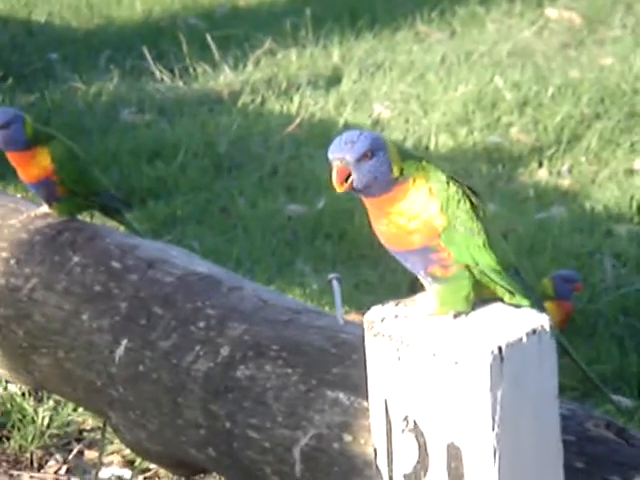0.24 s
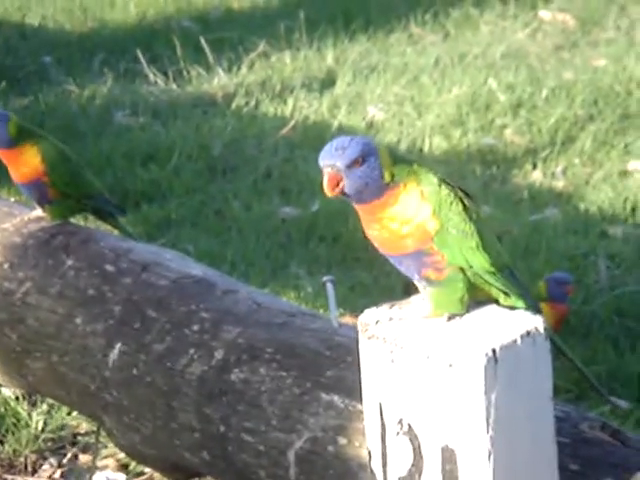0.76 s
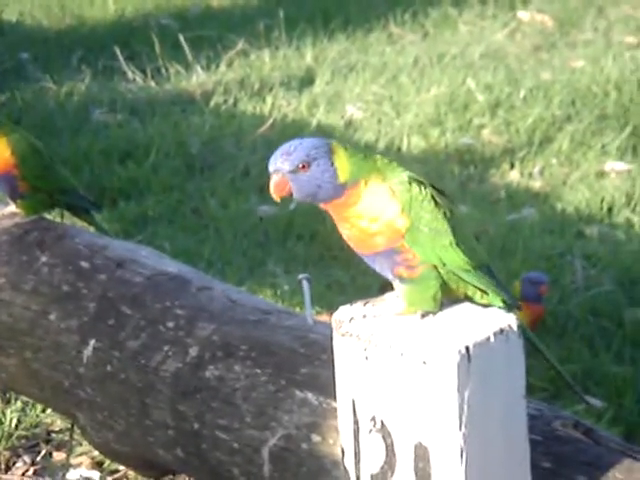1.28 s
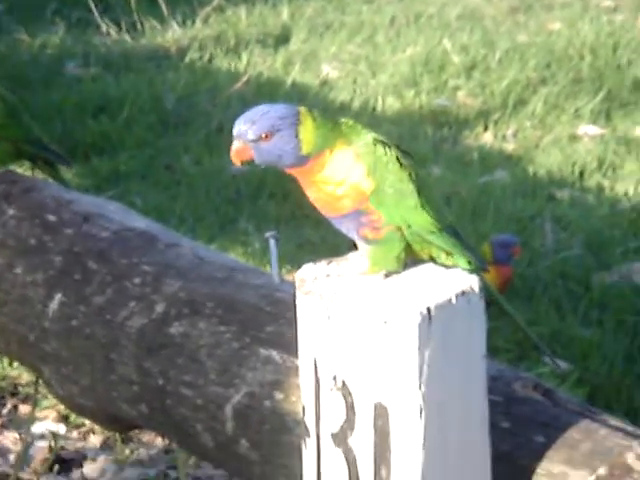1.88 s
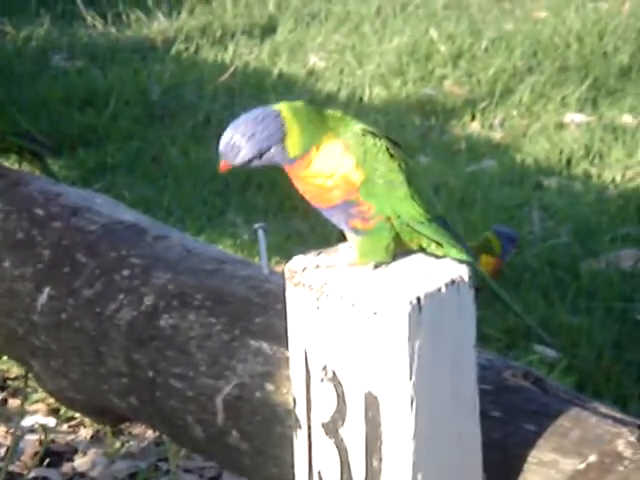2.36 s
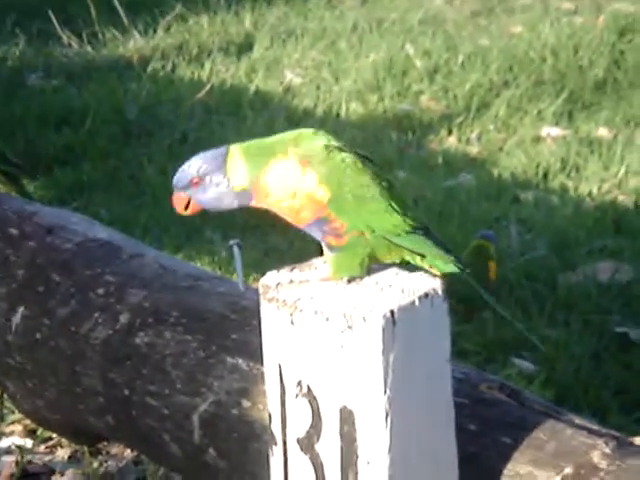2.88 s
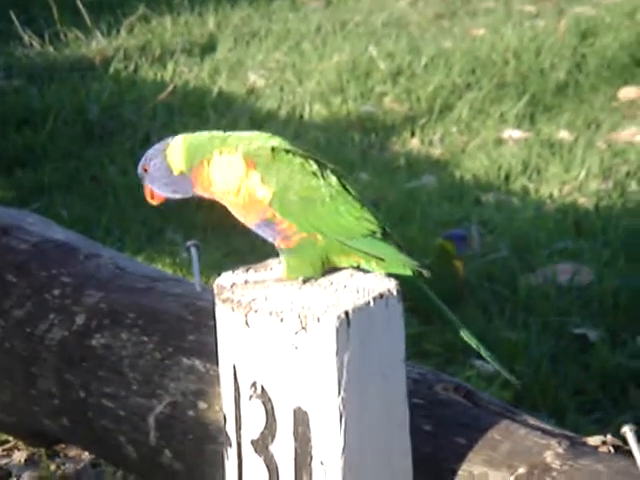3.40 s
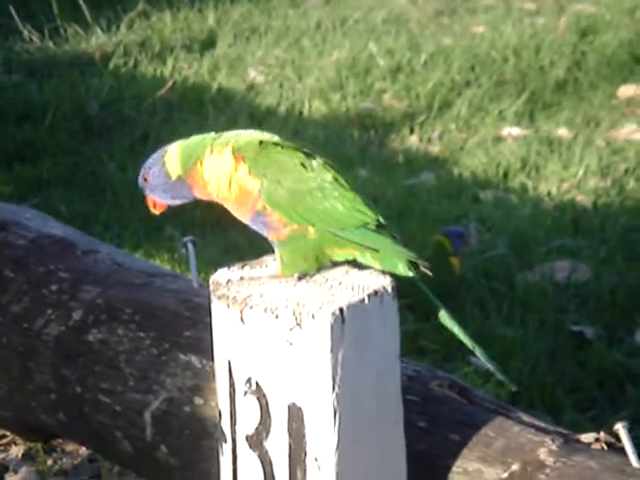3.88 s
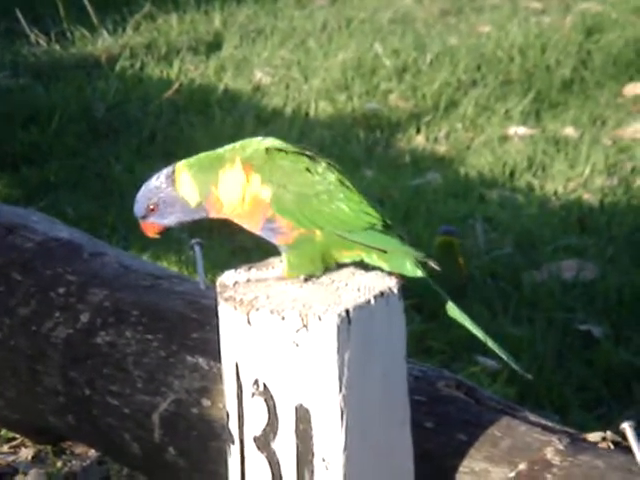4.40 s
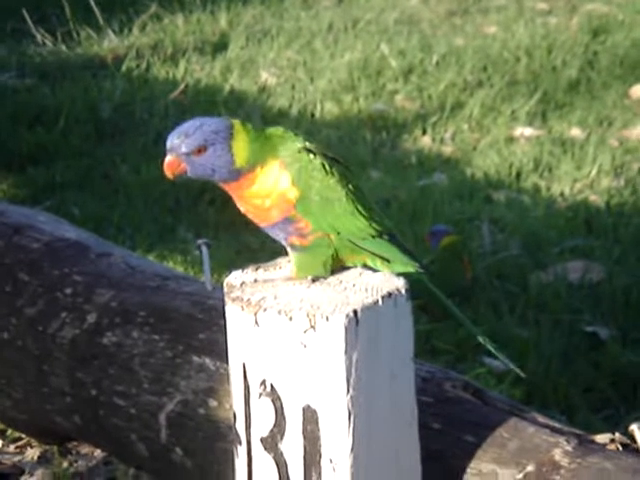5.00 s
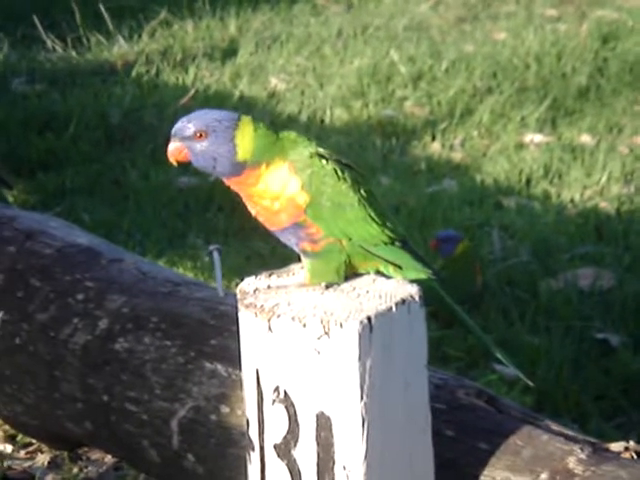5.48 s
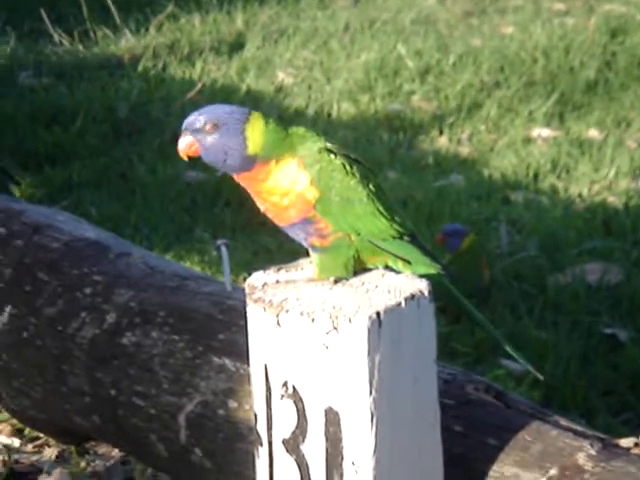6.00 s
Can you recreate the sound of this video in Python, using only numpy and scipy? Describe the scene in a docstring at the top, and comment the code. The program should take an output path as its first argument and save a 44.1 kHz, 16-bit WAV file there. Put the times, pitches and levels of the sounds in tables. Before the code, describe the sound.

Short, raspy parrot screeches come in bursts close by, while other birds chirp and chatter softly in the breezy background.

```python
"""A lorikeet screeches in quick runs on a lawn: its syrinx starts slack and raspy, then tightens and
scoops up to a shrill, buzzing whistle. Neighbours chirp, a beak or claw taps on wood, a flock chatters
in the trees, one far bird pips and a larger one honks. The trees echo faintly over a rush of breeze
and far traffic. An automatic gain control ducks that rush at each screech and lets it creep back."""
import sys
import numpy as np
from scipy import signal
from scipy.fft import rfft, irfft, next_fast_len
from scipy.io import wavfile
from scipy.ndimage import uniform_filter1d, map_coordinates

SR = 44100
rng = np.random.default_rng(int(sys.argv[2]) if len(sys.argv) > 2 else 0)


def waveform_to_disk(signal):
    """Save audio, clipped to [-1, 1], as 16-bit WAV at the path in sys.argv[1]."""
    frames = np.transpose(np.atleast_2d(signal))
    scaled = np.clip(frames, -1, 1) * 32767
    samples = np.round(scaled).astype(np.int16)
    wavfile.write(sys.argv[1], SR, samples)


N = 275625

# the lead bird's screeches:
# start_s, length_s, held_hz, rise_hz, sag_hz, level_db, second_partial_db, buzz_depth_hz
SCREECH_CALLS = [ (.073, 0.08105, 2708, 45.5, 24.5, -6.5, -1, 55.7),
                 (.251, 0.0967, 2643, 176.4, 169.5, -6.5, 1, 107.8),
                 (0.46, 0.1, 2657, 223.6, 43.5, -5, -1, 30.1),
                 (.717, 0.0997, 2685, 50.2, 34.5, -8, -4, 50.1),
                 (0.94, 0.1056, 2700, 110.7, 74.5, -7.5, -3.5, 69.8),
                 (1.19, 0.0847, 2439, 431.9, 1, -12, -5, 93),
                 (2.959, 0.1072, 2819, 29.55, 56.5, -10, 3.5, 21.48),
                 (3.152, 0.09646, 2725, 188.9, 104, -8.5, 5, 80.6),
                 (3.339, 0.0981, 2785, 35.13, 39, -8.5, 8.5, 60.4),
                 (3.558, 0.0956, 2692, 78.6, 66, -8, -1.5, 51.4),
                 (3.868, 0.09685, 2640, 111.2, 63, -12, 1, 34.08),
                 (4.104, 0.1116, 2666, 93.45, 64, -11.5, 0, 28.05),
                 (4.815, 0.1104, 2688, 129.4, 92.5, -9.5, -.5, 33.43)]
# tone colour of its windpipe and open beak: frequency_hz, gain_db
BEAK_EQ = [(900, -2), (1900, -5.5), (2750, -1), (3500, -3.5), (4200, -2.5), (5100, 0.5), (5700, -2),
           (6600, -4), (7600, 1.5), (8300, -1), (9000, -1.5), (9800, 3)]
# low croaks that open some screeches: start_s, level_db
CROAK_CUES = [(.237, -25), (2.953, -30), (3.328, -28.5)]
# the fading echo of an earlier screech, then the neighbours' soft chirps:
# start_s, length_s, start_hz, end_hz, level_db
TAIL_AND_CHIRP_NOTES = [ (0, 0.0674, 2840, 2790, -37.5), (1.495, 0.0627, 2070, 2176, -41.5),
                        (1.56, 0.037, 2129, 2377, -33), (1.615, 0.036, 3583, 2550, -26.5),
                        (1.643, 0.02744, 2300, 2787, -24), (5.05, 0.0432, 2714, 2500, -34.5),
                        (5.088, 0.0255, 3563, 3142, -39), (5.118, 0.0316, 4066, 4000, -37.5)]
# dry taps on wood: start_s, level_db
TAP_CUES = [(.891, -22.5), (2.235, -35)]
# ringing modes of that wood: pitch_hz, level_db, t60_s
WOOD_MODES = [(613.6, -6.5, 0.062), (1241, 9.5, 0.0131), (2815, 9.5, 0.0061)]
# the larger bird's far honks: start_s, length_s, start_hz, end_hz, level_db
HONK_NOTES = [(5.708, 0.0429, 523.8, 508, -31.5), (5.815, .185, 555, 462, -32.5)]
# resonances of its throat: frequency_hz, gain_db
THROAT_EQ = [(500, -32), (1050, -8.5), (1530, 3), (2050, -21), (2550, -1.5), (3100, -11.5), (4500, -31.5)]
# calls of two nearer members of the flock: start_s, length_s, start_hz, end_hz, level_db
CHATTER_NOTES = [(2.04, 0.1, 2430, 2384, -56.5), (2.18, 0.076, 2257, 2400, -45.5),
                 (5.49, 0.2, 2080, 2299, -43), (5.675, 0.1207, 2002, 2097, -38.5)]
# a far bird's plain whistles: start_s, level_db
PIP_CUES = [(0.152, -46.5), (0.929, -46), (1.411, -45), (1.7, -48.5), (2.27, -47)]
# swells of the flock's chatter: middle_s, half_length_s, level_db
FLOCK_BOUTS = [(1.485, 0.22, -40.5), (2.1, 0.23, -43.5), (2.548, 0.063, -45), (3.27, 0.185, -36.5),
               (5.074, 0.1386, -36.5), (5.779, 0.171, -38)]
# tone colour of the far flock: frequency_hz, gain_db
FLOCK_EQ = [(1200, -42.5), (2000, -26.5), (2900, -2), (3500, 0), (4300, 2.5), (5000, -8), (5900, -7.5),
            (7000, -20.5), (10000, -19.5)]
# decay of the echo among the trees: frequency_hz, t60_s
TREE_DECAY = [(500, 0.19), (3000, 0.756), (5500, 1.018), (10000, 1.22)]
# tone colour of the outdoor rush: frequency_hz, gain_db
AIR_EQ = [(25, -31), (55, -20), (100, -8.5), (165, -4), (350, -3), (950, -1), (1600, -7.5), (2800, -9.5),
          (4300, -16.5), (6500, -23), (10000, -23)]
# slow level ride of that rush: time_s, level_db
AIR_RIDE = [(0, -42.5), (1.5, -41), (2.8, -42), (4.6, -43), (5.5, -40), (6.25, -40)]

SLACK_HZ, SCOOP_S = 1834.3, .025  # a screech's opening pitch and its time to tighten
ATTACK_S, HEAD_START_S, RELEASE_S = 0.02402, 0.00494, .013
SAG_SKEW = 1.518  # over 1 puts the pitch sag past the middle of the call
BUZZ_RATE_HZ, BUZZ_SLOWING, BUZZ_FADE = 465, 0.705, 0.51  # slowing: Hz of rate lost per Hz of depth
THIRD_DB, THIRD_FOLLOWS = -25.5, .15  # third partial: alike in loud and soft calls, follows the second
SWELL_DB, SWELL_DB_PER_HZ, SPENT_PER_DB, ARCH_DB = 2.99, 0.0029, 1.1947, 2.5
SCRATCH_DB, SCRATCH_SPREAD_HZ = -13, 280


def screeches(jitter_hz=14, rasp_hz=90, flutter_db=1.8, drift_db=2.9):
    """The syrinx starts slack and raspy, tightens to a whistle, and a second vibration buzzes it."""
    out = np.zeros(N)
    for start_s, length_s, held_hz, rise_hz, sag_hz, level_db, second_db, depth_hz in SCREECH_CALLS:
        t = np.arange(int((length_s + RELEASE_S / 2) * SR)) / SR
        from_middle = t / length_s - 1 / 2
        tight = fade(t / SCOOP_S)
        slack = 1 - tight
        # after the scoop the pitch climbs, with one sag on the way
        hold = np.clip((t - SCOOP_S) / (length_s - SCOOP_S), 0, 1)
        whistle_hz = held_hz + rise_hz * hold - sag_hz * np.sin(np.pi * hold ** SAG_SKEW) ** 2
        # a deeper buzz is slower, and it settles as the call goes on
        rate_hz = (BUZZ_RATE_HZ - BUZZ_SLOWING * depth_hz) * (1 + 0.11 * wobble(t, 200))
        buzz = np.sin(2 * np.pi * np.cumsum(rate_hz) / SR)
        buzz *= (1 + .45 * wobble(t, 60)) * (1 - BUZZ_FADE * from_middle)
        grit = np.sqrt(depth_hz / 100)
        rough_hz = (jitter_hz + rasp_hz * slack) * wobble(t, 998.7)
        pitch = SLACK_HZ * slack + whistle_hz * tight + depth_hz * buzz + rough_hz
        # the fundamental stays nearly steady while the overtones flutter
        shimmer = lambda: flutter_db * wobble(t, 793) + drift_db * wobble(t, 80.72)
        third_db = THIRD_DB - level_db + THIRD_FOLLOWS * second_db
        partials = [(1, shimmer() / 5),
                    (2, second_db * tight + 1.5 * slack + shimmer() + 1.5 * buzz * grit),
                    (3, third_db * tight - 6 * slack + shimmer()),
                    (4, -25 + 15 * slack), (5, -30 + 16 * slack)]
        # slack membranes beat unevenly, which puts tones halfway between the partials
        partials += [(k + 1 / 2, -54 + 34 * np.sqrt(slack) + shimmer()) for k in range(4)]
        # the pressure arches and grows with the pitch; a bright, forced call spends its air early
        swell_db = SWELL_DB + SWELL_DB_PER_HZ * rise_hz - SPENT_PER_DB * second_db
        arch_db = ARCH_DB * (1 / 3 - (2 * from_middle) ** 2)
        pressure_db = level_db + swell_db * from_middle + arch_db + .5 * wobble(t, 112.3)
        # part of the second partial breaks into a chaotic scratch
        scratch_hz = 2 * pitch + SCRATCH_SPREAD_HZ * wobble(t, 650)
        scratch = amp(SCRATCH_DB + second_db / 2) * grit * voice(scratch_hz, [(0.994, 0)])
        gate = fade((t + HEAD_START_S) / ATTACK_S) * fade((t[-1] - t) / RELEASE_S)
        add(out, start_s, amp(pressure_db) * gate * (voice(pitch, partials) + scratch))
    return equalise(out, BEAK_EQ)


def croaks(start_hz=890, end_hz=1150, length_s=0.0227):
    """Before it tightens, the syrinx can sound an octave below the scoop."""
    rows = [(start_s, length_s, start_hz, end_hz, level_db) for start_s, level_db in CROAK_CUES]
    partials = [(1, -0.5), (2, 1.0), (3, -3), (4, -22.5)]
    return notes(rows, lambda pitch: partials, rough=.032, edge_s=0.0071, bend=1.9)


def tail_and_chirps():
    """Soft, gliding tones: the fading echo of an earlier screech, then the neighbours' chirps."""
    partials = [(1, 2.5), (2, -3.5), (3, -14.0), (4, -14.0)]
    return notes(TAIL_AND_CHIRP_NOTES, lambda pitch: partials, rough=0.0263, edge_s=0.0093, bend=2.1)


def taps():
    """A beak or claw knocks on wood; each mode builds over a cycle or so and rings very briefly."""
    out, t = np.zeros(N), np.arange(SR // 10) / SR
    for start_s, level_db in TAP_CUES:
        for hz, mode_db, t60_s in WOOD_MODES:
            envelope = amp(level_db + mode_db - 60 * t / t60_s) * fade(t * hz * 2 / 3)
            add(out, start_s, envelope * np.sin(2 * np.pi * hz * t))
    return out


def honks():
    """A hoarse, nasal double call; its partials slide through the throat's steady resonances."""
    partials = lambda pitch: [(k, along(THROAT_EQ, k * pitch)) for k in range(1, 9)]
    return notes(HONK_NOTES, partials, rough=.052, edge_s=0.0158, bend=2.2)


def chatter():
    """Raspy calls from the trees, with the second partial strongest."""
    partials = [(1, -16.5), (2, 3), (3, -9.5), (4, -13.5)]
    return notes(CHATTER_NOTES, lambda pitch: partials, rough=0.0347, edge_s=0.011)


def pips(pitch_hz=1750, length_s=0.0637):
    """A far bird repeats one short, pure note at uneven gaps."""
    rows = [(start_s, length_s, pitch_hz, pitch_hz, level_db) for start_s, level_db in PIP_CUES]
    return notes(rows, lambda pitch: [(1, 0)], rough=0.013, edge_s=.004)


def flock(count=520, centre_hz=2300, glide=.06, calm_db=-47):
    """A bed of overlapping, raspy far calls, blurred by the trees and swelling in bouts."""
    calls = np.zeros(N)
    starts_s = (np.arange(count) + rng.random(count)) * N / SR / count
    for start_s, (high, long, loud) in zip(starts_s, rng.standard_normal((count, 3))):
        t = np.arange(int(0.051 * np.exp(0.37 * long) * SR)) / SR
        rasp = .028 * wobble(t, 900)
        pitch = centre_hz * np.exp(0.22 * high + glide * wobble(t, 30.21) + rasp)
        envelope = amp(0.73 * loud) * np.sqrt(np.hanning(len(t)))
        add(calls, start_s, envelope * voice(pitch, [(1, 4.5), (2, -5), (3, 4.5)]))
    bed = unit(equalise(calls + echo(calls), FLOCK_EQ))
    t = np.arange(N) / SR
    bout_power = sum(amp(level_db) ** 2 * np.exp(-((t - middle_s) / half_s) ** 2)
                     for middle_s, half_s, level_db in FLOCK_BOUTS)
    return bed * np.sqrt(amp(calm_db) ** 2 + bout_power)


def echo(x, predelay_s=0.018):
    """Trunks and leaves scatter the sound back in a diffuse tail."""
    hz, t, noise = signal.stft(rng.standard_normal(SR), SR, nperseg=256)
    decay = amp(-60 * t / along(TREE_DECAY, hz)[:, None])
    tail = signal.istft(noise * decay, SR, nperseg=256)[1]
    delayed = np.pad(x, (int(predelay_s * SR), 0))
    return signal.fftconvolve(delayed, tail / np.linalg.norm(tail))[:N]


def air():
    """The steady rush of breeze and far traffic."""
    t = np.arange(N) / SR
    rush = unit(equalise(rng.standard_normal(N), AIR_EQ))
    ride_db = np.interp(t, *np.transpose(AIR_RIDE))
    return rush * amp(ride_db + 0.15 * wobble(t, 2.8))


def notes(rows, partials, rough, edge_s, bend=1):
    """Unsteady notes voiced by partials(pitch); a bend over 1 makes each glide speed up."""
    out = np.zeros(N)
    for start_s, length_s, start_hz, end_hz, level_db in rows:
        t = np.arange(int(length_s * SR)) / SR
        glide_hz = start_hz + (end_hz - start_hz) * (t / length_s) ** bend
        pitch = glide_hz * (1 + rough * wobble(t, 700))
        gate = fade(np.minimum(t, length_s - t) / edge_s)
        add(out, start_s, amp(level_db) * gate * voice(pitch, partials(pitch)))
    return out


def voice(pitch, partials):
    """A tone of rms 1 on a pitch curve; each partial is a pitch multiple and a level_db."""
    phase = 2 * np.pi * np.cumsum(pitch) / SR
    return unit(sum(amp(db) * np.sin(k * phase) * (k * pitch < SR / 2) for k, db in partials))


def amp(db):
    """Decibels to gain."""
    return 10 ** (np.asarray(db) / 20)


def unit(x):
    """Scale to rms 1."""
    return x / np.sqrt(np.mean(x ** 2) + 1e-20)


def along(points, hz):
    """Read a curve on a log frequency axis."""
    knots_hz, values = np.transpose(points)
    return np.interp(np.log(hz + 1), np.log(knots_hz + 1), values)


def wobble(t, rate):
    """A smooth random curve with rate knots a second."""
    return map_coordinates(rng.standard_normal(int(t[-1] * rate) + 4), [t * rate + 1])


def filtered(x, response):
    """Filter x with the gain response(hz)."""
    size = next_fast_len(N + SR // 2)
    return irfft(rfft(x, size) * response(np.fft.rfftfreq(size, 1 / SR)), size)[:N]


def equalise(x, eq):
    """Colour x with an EQ table."""
    return filtered(x, lambda hz: amp(along(eq, hz)))


def add(track, start_s, sound):
    """Mix a sound in at start_s."""
    room = track[max(round(start_s * SR), 0):][:len(sound)]
    room += sound[:len(room)]


def fade(u):
    """A smooth step from 0 to 1 as u goes from 0 to 1."""
    return np.sin(np.pi / 2 * np.clip(u, 0, 1)) ** 2


def scene():
    """Near birds almost dry, far birds wetter, over the flock and the open air."""
    near = screeches() + croaks() + tail_and_chirps() + taps()
    far = honks() + pips() + chatter()
    echo_send = amp(-23.5) * near + amp(-4.5) * far
    return (near + far + echo(echo_send) + flock() + air())[None]


def record(dry, threshold_db=-15, quick_db_per_s=130, slow_db_per_s=4, slow_share=0.665,
           opening_cut_db=7, detector_s=.005, top_hz=10150):
    """Gain control ducks loud sound, recovers partly at once, fully over seconds; then a high cut."""
    t = np.arange(N) / SR
    pole = np.exp(-1 / (detector_s * SR))
    level_db = 10 * np.log10(signal.lfilter([1 - pole], [1, -pole], dry[0] ** 2) + 1e-12)
    excess_db = 0.9813 * np.maximum(level_db - threshold_db, 0)
    recover = lambda db, speed: np.maximum.accumulate(db + speed * t) - speed * t
    quick_db = recover(excess_db, quick_db_per_s)
    slow_db = recover(slow_share * excess_db, slow_db_per_s)
    slow_db = np.maximum(slow_db, opening_cut_db - slow_db_per_s * t)  # the gain starts turned down
    cut_db = uniform_filter1d(np.maximum(quick_db, slow_db), size=220)
    return filtered(dry[0] * amp(-cut_db), lambda hz: fade((top_hz - hz) / 300 + 1 / 2))[None]


dry = scene()
out = record(dry)
waveform_to_disk(out)
```